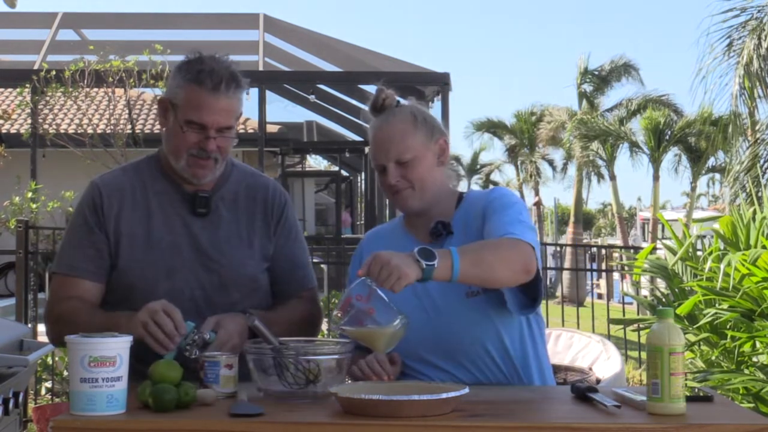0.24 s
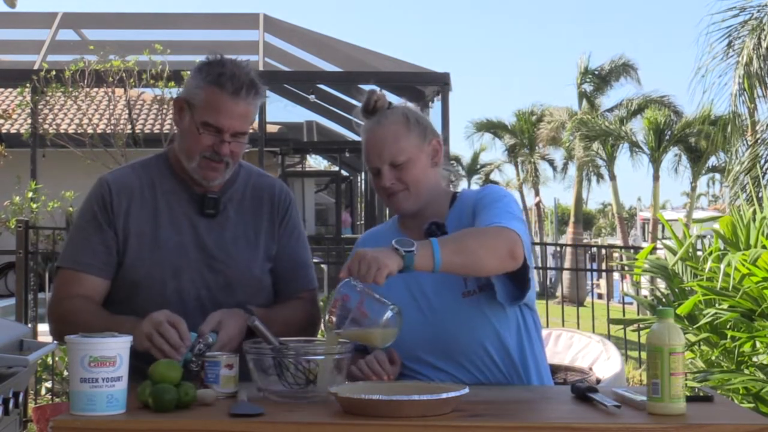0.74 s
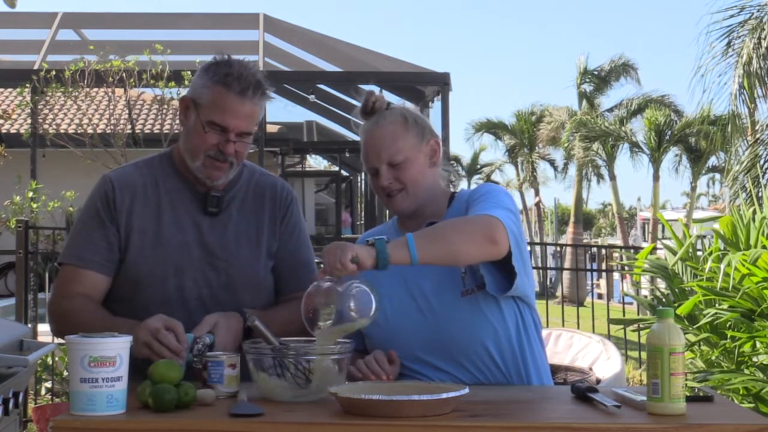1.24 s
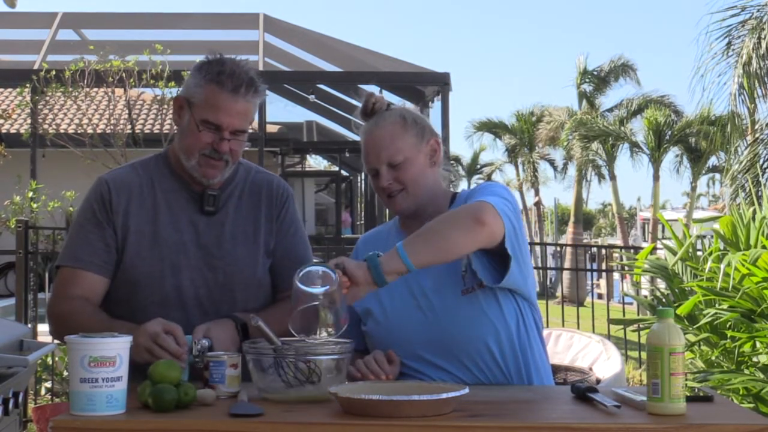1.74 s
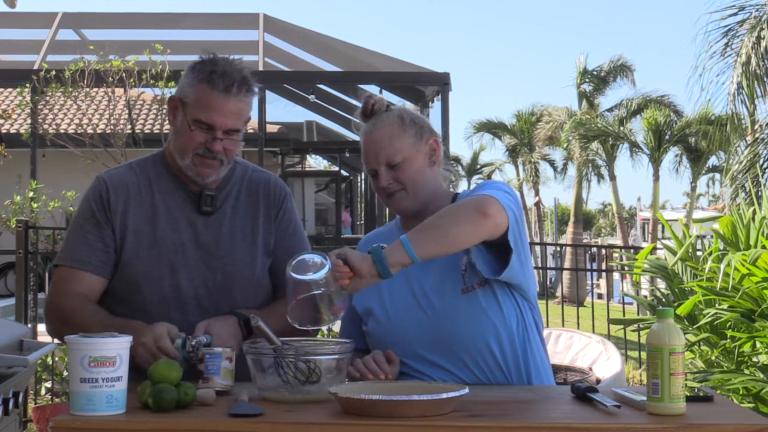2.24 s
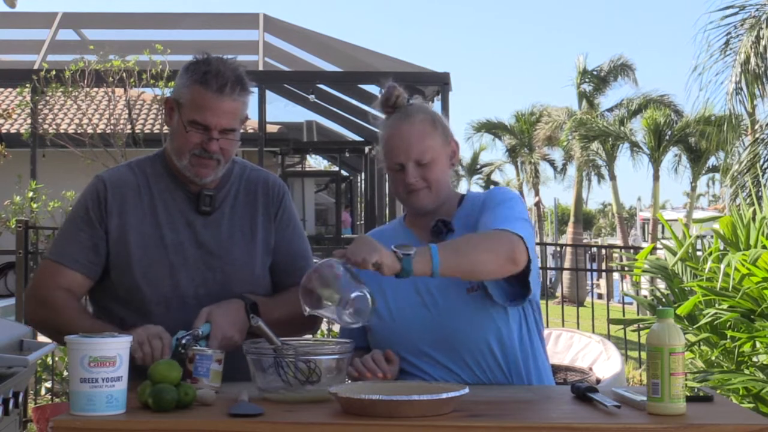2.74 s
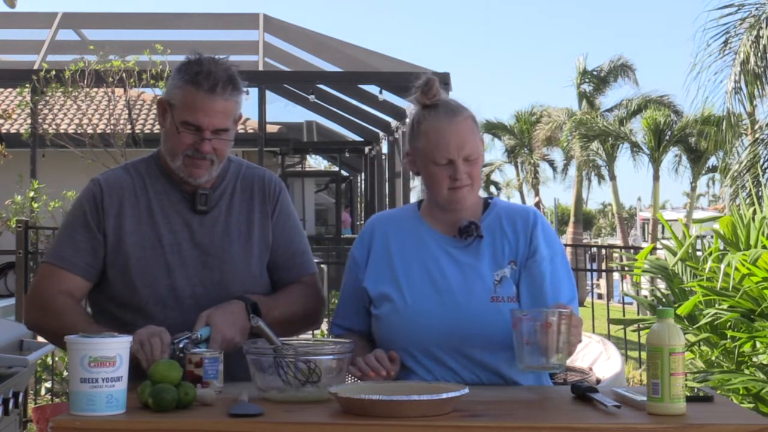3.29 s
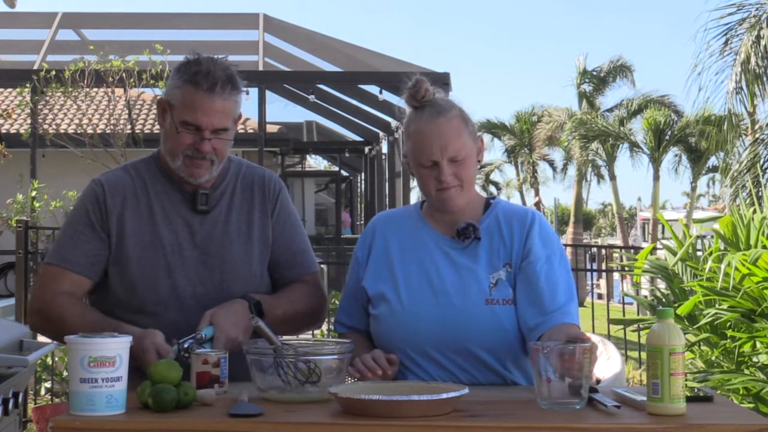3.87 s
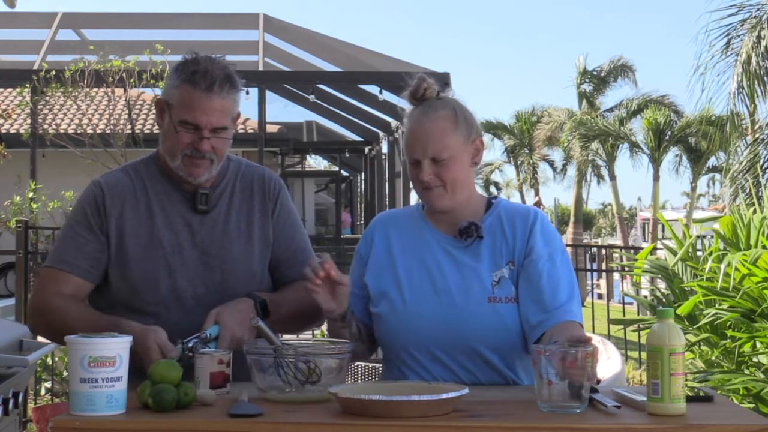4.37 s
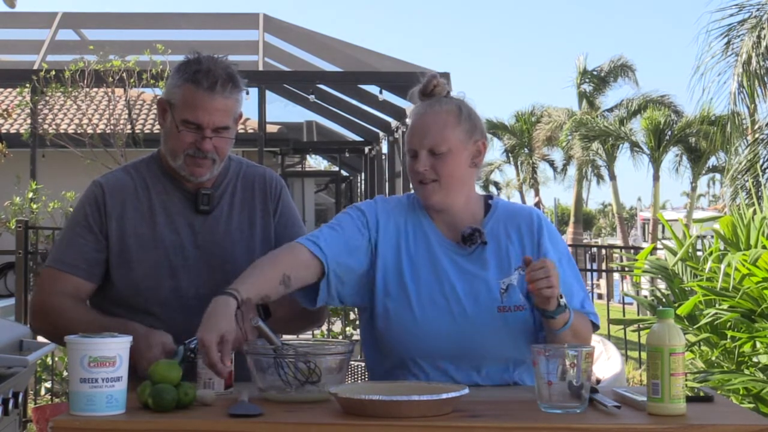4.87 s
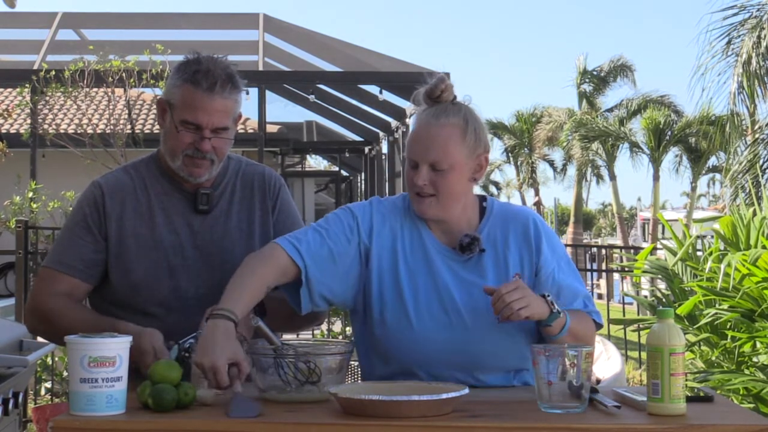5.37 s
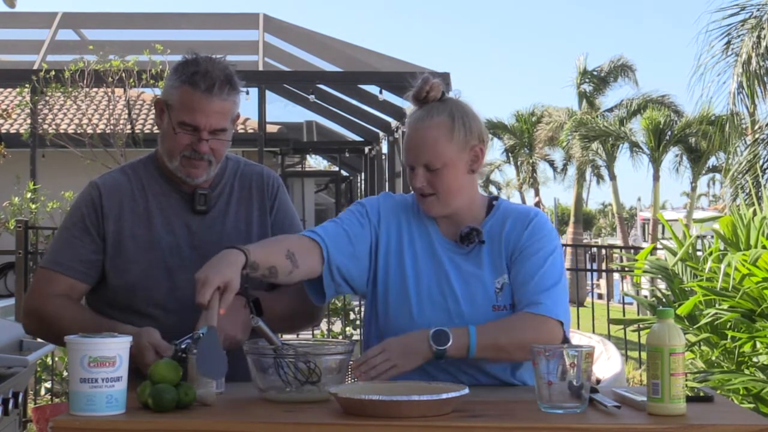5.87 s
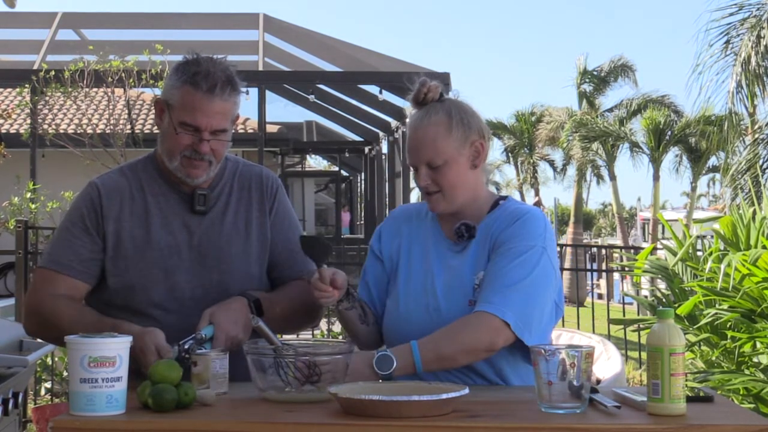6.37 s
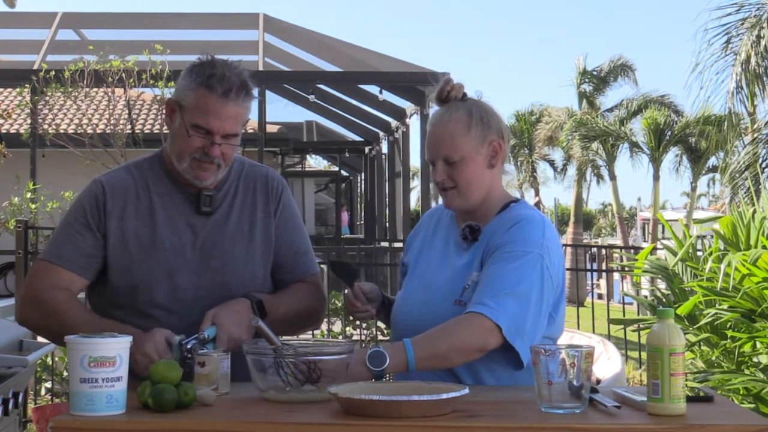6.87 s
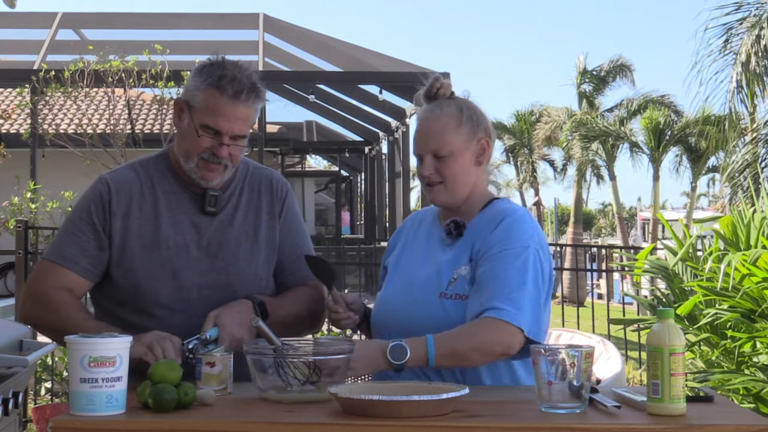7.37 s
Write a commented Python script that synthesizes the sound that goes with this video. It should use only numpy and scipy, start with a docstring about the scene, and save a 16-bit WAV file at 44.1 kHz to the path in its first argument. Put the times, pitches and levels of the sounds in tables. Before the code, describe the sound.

A brief pour of juice gurgles and splashes into a mixing bowl over faint garden hiss, with slight shirt rustle on the microphone. Then a metal can opener takes over: short, crunchy ratcheting turns about every half second, bright clicking teeth over a resonant tin rumble, some starting with a small squeak. Loose handle knocks and tiny clinks fill the gaps. Close and dry, with only weak patio reflections.

```python
"""A crank opener cuts a full can on a patio: eight turns grind through the lid while the feed wheel ticks.
Its sounds are impacts and stick-slip friction, random forces that excite the resonances of can and lid.
Juice poured into a mixing bowl is a sum of ringing air bubbles and filtered spray.
Decaying sine modes make metal clinks; shaped noise makes rustling cloth and the quiet garden.
The image is nearly mono, slightly widened by a faint, mostly high noise."""
import sys
import numpy as np
from scipy import signal
from scipy.fft import rfft, irfft
from scipy.io import wavfile
from scipy.ndimage import uniform_filter1d

SR = 44100
rng = np.random.default_rng(int(sys.argv[2]) if len(sys.argv) > 2 else 0)


def unload_audio(sound):
    """Save the sound as a 16-bit wav file, at the path given as the first command line argument."""
    columns = np.transpose(np.atleast_2d(sound))
    # keep every value between -1 and 1, then stretch to whole-number steps
    steps = np.round(np.clip(columns, -1, 1) * 32767)
    wavfile.write(sys.argv[1], SR, steps.astype(np.int16))


N = 336952
TIME = np.arange(N) / SR


def from_db(db):
    """Amplitude ratio: 20 dB is a factor of ten."""
    return 10 ** (np.asarray(db) / 20)


def rms_one(x):
    """Power normalisation: scale to rms 1."""
    return x / np.sqrt(np.mean(x ** 2) + 1e-20)


def unit_energy(x):
    """Energy normalisation: scale to a summed square of 1."""
    return x / np.sqrt(np.sum(x ** 2) + 1e-20)


def add(out, s, sound):
    """Superposition: mix a sound in from time s."""
    at = max(round(s * SR), 0)
    out[at:at + len(sound)] += sound[:N - at]


def coloured(x, points, size=2048):
    """Minimum-phase filtering: a causal response through (f/Hz, level/dB) points, by a folded cepstrum."""
    hz, db = np.transpose(points)
    grid = np.maximum(np.arange(size // 2 + 1) * SR / size, 1)
    log_gain = np.log(from_db(np.interp(np.log(grid), np.log(hz), db)))
    cepstrum = irfft(log_gain)
    cepstrum[1:size // 2] *= 2
    cepstrum[size // 2 + 1:] = 0
    response = irfft(np.exp(rfft(cepstrum)))
    return signal.fftconvolve(x, response)[:len(x)]


def dying(t, t60):
    """Exponential decay: the envelope falls 60 dB in t60."""
    return np.exp(-np.log(1000) * t / t60)


def stroke(start, end, rise_s, fall_s):
    """Exponential onset and decay: steady between two times, 60 dB lower rise_s before and fall_s after."""
    onset = dying(np.clip(start - TIME, 0, 1), rise_s)
    return onset * dying(np.clip(TIME - end, 0, 1), fall_s)


def along(curve, axis):
    """Level interpolation: gain over time from one dB column, at -200 dB before the curve begins."""
    rows = np.array(curve)
    return from_db(np.interp(TIME, rows[:, 0], rows[:, axis], left=-200))


def drift(rate):
    """Random modulation: straight lines join normal random values, rate of them a second."""
    return np.interp(TIME * rate, np.arange(4096), rng.standard_normal(4096))


def grains(per_s, spread_db):
    """Shot noise: randomly timed clicks of uneven size and sign."""
    sizes = from_db(spread_db * np.minimum(rng.exponential(1, N), 4))
    sizes = sizes * rng.choice([-1, 1], N)
    return sizes * (rng.random(N) < per_s / SR)


def resonate(x, table):
    """Parallel resonance: the direct sound plus two-pole modes whose decay follows from their width."""
    out = x.copy()
    for hz, width_hz, db in table:
        r = np.exp(-np.pi * width_hz / SR)
        feed = np.array([1, 0, -1]) * (1 - r * r) / 2
        back = [1, -2 * r * np.cos(2 * np.pi * hz / SR), r * r]
        out += from_db(db) * signal.lfilter(feed, back, x + 1e-18)
    return out


# resonances of can and opener: f/Hz, width/Hz, level over the direct sound/dB
CAN_MODES = [(291, 13.7, 3.5), (334.5, 67, 3), (454, 21, -8.5), (528, 56, -6.5), (734.7, 27, -3),
             (780, 61, -5.5), (865, 91, -8), (1150, 166, -2.5), (1273, 92, -0.5), (1467, 55, 7),
             (1590, 106, 2), (1845, 160, 3.5), (2080, 80, -30), (2190, 210, -9.5), (2790, 94, -18),
             (4900, 110, -8), (8940, 50, 2.5), (9500, 230, 7), (9800, 240, 7.5)]


def can(x):
    """Forced resonance: every contact rings the can and the opener."""
    return resonate(x, CAN_MODES)


def blow(t, chatter_db, t60, build_s=0.005):
    """Impulsive excitation: a click, then the dense, quickly dying chatter of loose metal parts."""
    chatter = rng.standard_normal(len(t)) * dying(t, t60) * (1 - dying(t, build_s))
    force = from_db(chatter_db) * unit_energy(chatter)
    force[0] += 1
    return force


# turns of the crank: start t/s, end t/s, time per tooth/s, hardest tooth level/dB, its place in the turn (0-1),
# can rumble level/dB, hiss level/dB, top treble gain/dB
TURNS = [(2.9006, 2.968, 0.017, -1, 0.7, -21, -40.5, -3.5),
         (3.8253, 3.913, 0.013, -2.5, 0.46, -19.5, -41.5, -2.5),
         (4.2884, 4.35, 0.0158, -1.5, 0.54, -17, -36.5, -4.5),
         (4.7622, 4.831, 0.013, -3.5, 0.46, -17, -37, 6.5), (5.291, 5.34, 0.021, -2, 0.5, -18, -39.5, 3),
         (5.838, 5.912, 0.0178, -2, 0.47, -18, -38, -4.5),
         (6.355, 6.432, 0.019, -1, 0.46, -19.5, -33.5, -8.5), (6.922, 7.004, 0.02, -1, 0.23, -19, -31, -13)]
# single snaps outside the even runs of teeth, one of them a loud extra tooth during a turn:
# t/s, level before single_db/dB
SINGLE_SNAPS = [(0.6449, -20.5), (0.6955, -20), (0.8594, -27.5), (3.2207, -40), (5.222, -31), (5.7388, -28),
                (6.4171, -17), (7.3073, -39)]
# colour of a tooth's contact: f/Hz, relative level/dB
TOOTH_COLOUR = [(200, 0.5), (800, 2), (3000, 19), (4200, 4.5), (5500, 6), (8400, -11.5), (12000, -1.5),
                (15000, -11.5)]


def teeth(single_db=11.5, delay_s=0.001242, ease_db=25.5, scatter_db=1.0):
    """Periodic impact: each tooth snaps into the rim, in an even run that swells and eases through a turn."""
    out, t = np.zeros(N), TIME[:SR // 10]
    snaps = [(s, db + single_db) for s, db in SINGLE_SNAPS]
    for start, end, tooth_s, db, hardest, *_ in TURNS:
        s = np.arange(start, end, tooth_s)
        away = (s - start) / (end - start) - hardest
        # ease_db would be the loss a whole turn away from the hardest tooth
        levels = db - ease_db * away ** 2 + scatter_db * rng.standard_normal(len(s))
        snaps += zip(s, levels)
    for s, db in snaps:
        force = blow(t, chatter_db=24.0, t60=0.014, build_s=0.00079)
        snap = unit_energy(can(coloured(force, TOOTH_COLOUR)))
        add(out, s + delay_s, from_db(db) * snap)
    return out


# slides on the rim while the opener is being seated: start t/s, end t/s, rise/s, fall/s,
# can rumble level/dB, hiss level/dB, top treble gain/dB
SCRAPES = [(0.586, 0.588, 0.064, 0.16, -30.5, -39.5, -8), (0.82, 0.841, 0.086, 0.12, -32, -43, -0.5),
           (1.842, 1.875, 0.035, 0.41, -33, -35.5, -14), (2.292, 2.324, 0.1, 0.12, -42, -45, 11),
           (2.335, 2.392, 0.1, 0.18, -33.5, -39, -10)]
TURN_RISE_S, TURN_FALL_S = 0.047, 0.14   # 60 dB rise and fall; grind() shortens the fall for the hiss


def slides():
    """Sliding contact: the seating scrapes, then the turns, all with the columns of a scrape."""
    turns = [(start, end, TURN_RISE_S, TURN_FALL_S, rumble_db, hiss_db, top_db)
             for start, end, *_, rumble_db, hiss_db, top_db in TURNS]
    return list(SCRAPES) + turns


def steel(x, t60=0.024):
    """High modal density: crowded high modes of thin steel parts ring on briefly, as decaying noise."""
    t = TIME[:SR // 10]
    ringing = unit_energy(rng.standard_normal(len(t)) * dying(t, t60))
    return x / 2 + 0.86 * signal.oaconvolve(x, ringing)[:N]


# colours of coarse slips and of fine tearing: f/Hz, relative level/dB
RUMBLE_COLOUR = [(40, -80.5), (120, -16), (230, -10), (300, 4.5), (450, 3.5), (630, 3.5), (850, 4),
                 (1300, -2.5), (1650, -18.5), (2800, -12.5), (4000, -20.5), (9000, -70.5)]
HISS_COLOUR = [(500, -22), (1500, 8), (3000, 9), (4000, 2.5), (5500, 4), (7300, 0), (8400, -9),
               (10000, -4.5), (12500, 1.5), (15000, -19)]
# the lid sings under the blade: f/Hz, width/Hz, level over the direct sound/dB
LID_MODES = [(726, 4.4, 5), (1494, 5.4, 11), (2964, 45, -9.5), (4730, 150, -3)]


def grind(slips_per_s=1800, tears_per_s=7000, uneven_db=3.0, hiss_fall_share=0.9):
    """Stick-slip friction: steel slides on tin; coarse slips shake the can and fine tearing hisses."""
    jerk = from_db(uneven_db * drift(220))
    slips = jerk * grains(slips_per_s, spread_db=3.0)
    rumble = resonate(can(coloured(slips, RUMBLE_COLOUR)), LID_MODES)
    rumble /= np.sqrt(uniform_filter1d(rumble ** 2, SR // 25))   # the hand keeps the force steady
    tears = jerk * grains(tears_per_s, spread_db=2.5)
    hiss = rms_one(resonate(can(coloured(tears, HISS_COLOUR)), LID_MODES))
    out = np.zeros(N)
    for start, end, rise_s, fall_s, rumble_db, hiss_db, _ in slides():
        out += from_db(rumble_db) * rumble * stroke(start, end, rise_s, fall_s)
        # the blade sits somewhere else at each stroke, so the steel rings differently
        tearing = hiss * stroke(start, end, rise_s, hiss_fall_share * fall_s)
        out += from_db(hiss_db) * steel(tearing)
    return out


def shrillness(x, edge_hz=8200):
    """Spectral balance: the top treble changes from stroke to stroke as the hands move round the can."""
    start, end, *_, top_db = np.transpose(slides())
    top = signal.sosfiltfilt(signal.butter(4, edge_hz, "high", fs=SR, output="sos"), x)
    gain = from_db(np.interp(TIME, (start + end) / 2, top_db))
    return x + (gain - 1) * top


def band(x, hz, width_hz):
    """Band-pass filtering: a resonance of the given width around hz."""
    edges = [hz - width_hz / 2, hz + width_hz / 2]
    return signal.sosfilt(signal.butter(2, edges, "band", fs=SR, output="sos"), x)


# the axle squeaks on some turns as it takes up the load: start t/s, end t/s, level/dB, f/Hz
SQUEAKS = [(2.877, 2.938, -38.5, 3110), (3.816, 3.865, -38.5, 2930), (4.747, 4.775, -42, 2900),
           (5.242, 5.267, -41.5, 2866)]


def squeaks(width_hz=70.0, rasp_db=-11.0):
    """Stick-slip resonance: uneven slips of the crank axle ring one sharp mode over a broader rasp."""
    out = np.zeros(N)
    for start, end, db, hz in SQUEAKS:
        slips = grains(2500, spread_db=0.5) + 1e-18
        tone = band(slips, hz, width_hz)
        rasp = rms_one(band(slips, hz, 10 * width_hz))
        tone /= np.sqrt(np.abs(uniform_filter1d(tone ** 2, SR // 50)) + 1e-12)   # the hand keeps the force steady
        envelope = stroke(start, end, rise_s=0.011, fall_s=0.07)
        out += from_db(db) * envelope * (tone + from_db(rasp_db) * rasp)
    return out


# the opener rocks against the can as the hand lets go and grips again:
# t/s, level before level_db/dB, bass share/dB, treble share/dB
KNOCKS = [(0.574, -13.5, -9, -40), (0.645, -18.5, -8, -14), (0.695, -17.5, -10.5, -16.5),
          (1.969, -20.5, -13, -48), (2.014, -23, -14, -43), (2.762, -1.5, -18, -11), (2.955, -1, -21, -17),
          (3, -17, -9.5, -7.5), (3.08, -4, -17.5, -17), (3.129, -13, -18, -18.5), (3.194, -27, -10, -23),
          (3.292, -4.5, -18.5, -29), (3.59, -13.5, -15, -11.5), (3.748, -19.5, -12.5, -20.5),
          (3.896, -4.5, -21, -27), (4.009, -3, -16, -25), (4.04, -0.5, -15, -22.5), (4.072, -7.5, -7, -32),
          (4.229, -14.5, -1, -11), (4.281, -3.5, -41, -9), (4.491, -4, -19.5, -29.5),
          (4.557, -22.5, -22, -29), (4.694, -10.5, -26.5, -28), (4.916, -14.5, -12, -37),
          (4.973, -19, -10.5, -50), (5.139, -25, -14, -23), (5.202, -11, -18, -29), (5.223, -12.5, -10, -1),
          (5.25, -11.5, -15.5, -23.5), (5.362, -3.5, -15, -25), (5.379, -6, -15, -18),
          (5.477, -2.5, -17, -26), (5.509, -5.5, -13, -18.5), (5.651, -13.5, -13, -36),
          (5.747, -9.5, -17.5, -20.5), (5.818, -15, -12, -28), (5.996, -14, -15, -40),
          (6.084, -6, -35, -17), (6.282, -16, -36, -22), (6.339, -4, -17, -17), (6.477, -15, -24, -27),
          (6.512, -14.5, -6, -47), (6.644, -14, -15.5, -48), (6.903, -16, -11, -9), (6.923, -6, -23, -12),
          (7.029, -3.5, -20, -15.5), (7.236, -9, -30, -28), (7.392, -17.5, -26, -33)]
# colour of a knock's contact: f/Hz, relative level/dB
KNOCK_COLOUR = [(40, -73.5), (120, -13.5), (220, -9), (300, 1.5), (500, 7), (630, 3.5), (850, 3.5),
                (1300, -6), (1650, -15.5), (2200, -15.5), (2500, -21.5), (3500, -34), (6000, -59.5),
                (12000, -76)]


def knocks(level_db=18.0, delay_s=0.0016, hard_slope=0.75, rebound_s=0.02, rebound_db=-13.5, rebound_cut_hz=740):
    """Impact hardness: hard contacts are bright, soft ones dull; each falls back once, softer and duller."""
    out, t = np.zeros(N), TIME[:SR // 5]
    usual_bass, usual_treble = np.median(KNOCKS, axis=0)[2:]
    soft = signal.butter(2, rebound_cut_hz, fs=SR, output="sos")
    for s, db, bass_db, treble_db in KNOCKS:
        force = blow(t, chatter_db=7.0, t60=0.042)
        # the bass chatters longer than the treble
        slow_chatter = unit_energy(rng.standard_normal(len(t)) * dying(t, t60=0.075))
        force += from_db(-0.5) * coloured(slow_chatter, [(1300, 3), (3200, -15)])
        hard = hard_slope * (treble_db - usual_treble)
        contact = [(380, bass_db - usual_bass), (850, 0.0029), (1900, hard), (4500, hard)]
        struck = coloured(coloured(force, KNOCK_COLOUR), contact)
        knock = from_db(db + level_db) * unit_energy(can(struck))
        add(out, s + delay_s, knock)
        fall_back = from_db(rebound_db) * signal.sosfilt(soft, knock)
        add(out, s + rebound_s * rng.uniform(0.7, 1.4), fall_back)
    return out


def bubble(hz, cycles, rise, longest_s=0.07):
    """Bubble resonance: the pitch rises as a bubble nears the surface; thick juice damps the big ones."""
    t60 = min(cycles / hz, longest_s)
    t = TIME[:int(t60 * SR) + 2]
    return np.sin(2 * np.pi * hz * t * (1 + rise * t / t60)) * dying(t, t60)


# the stream of juice, before the mix in juice(): t/s, bubble level/dB, spray level/dB
POUR = [(0.88, -57.5, -56.5), (0.99, -54, -56), (1.006, -53, -45), (1.106, -45, -53.5), (1.12, -51.5, -37),
        (1.13, -42.5, -42.5), (1.308, -58, -54), (1.386, -38, -42), (1.595, -36.5, -37)]
POUR_STOP_S, POUR_FALL_S = 1.625, 0.16   # the cup runs empty and the stream dies by 60 dB


def stream(axis):
    """Source strength: gain of the juice over time, for its bubbles (column 1) or its spray (column 2)."""
    return along(POUR, axis) * dying(np.clip(TIME - POUR_STOP_S, 0, 1), POUR_FALL_S)


def fizz(low_hz, high_hz, cycles, count):
    """Bubble statistics: many small bubbles, more while the stream is strong, evened to about rms 1."""
    out = np.zeros(N)
    born = np.cumsum(stream(axis=1) ** 0.8)
    for when, pitch, size, depth in rng.random((count, 4)):
        hz = low_hz * (high_hz / low_hz) ** pitch
        s = np.searchsorted(born, when * born[-1]) / SR
        add(out, s, from_db(-20 * size) * bubble(hz, cycles, rise=0.08 * depth))
    return out / np.sqrt(np.abs(uniform_filter1d(out ** 2, SR // 20)) + 1e-6)


# the loudest single drops: t/s, level before drop_db or splash_db/dB, starting bubble f/Hz
DROPS = [(0.9558, -34.5, 2240), (1.0181, -25.5, 6030), (1.0445, -31, 5140), (1.0874, -29, 1200),
         (1.1222, -27, 6130), (1.1414, -27, 5770), (1.2131, -26.5, 5650), (1.2605, -34, 5160),
         (1.4386, -24, 4800), (1.5214, -19.5, 1630), (1.5446, -19, 5500), (1.615, -15.5, 1714),
         (1.6429, -13, 5460), (1.7384, -19, 1130)]
# colour of spray and splashes: f/Hz, relative level/dB
SPRAY_COLOUR = [(200, -20), (700, -61), (1500, 11), (3300, -9), (5500, 2), (9000, -18), (15000, -12)]


def juice(bubble_db=-3.5, fine_db=-3.0, spray_db=-10.5, drop_db=-2.5, splash_db=-9.5):
    """Entrained air: a thin stream lands in the bowl as ringing bubbles, noisy spray and single drops."""
    out = from_db(bubble_db) * stream(axis=1) * fizz(1363, 3270, cycles=100, count=700)
    spray = from_db(spray_db) * rms_one(coloured(grains(3600, spread_db=6), SPRAY_COLOUR))
    fine = fizz(3810, 7050, cycles=76, count=380)
    fine += from_db(-5.5) * fizz(7420, 14400, cycles=150, count=420)
    out += stream(axis=2) * (spray + from_db(fine_db) * fine)
    t = TIME[:SR // 20]
    for (s, db, hz), depth in zip(DROPS, rng.random(len(DROPS))):
        drop = bubble(hz, cycles=92, rise=0.065 + 0.1 * depth)
        add(out, s + 0.00101, from_db(db + drop_db) * drop)
        splash = coloured(rng.standard_normal(len(t)) * dying(t, t60=0.052), SPRAY_COLOUR)
        add(out, s, from_db(db + splash_db) * splash)
    return signal.sosfilt(signal.butter(2, 450, "high", fs=SR, output="sos"), out)


def gulp(start_s=1.38, end_s=1.62, level_db=-42, start_hz=1490, climb_hz_per_s=2680, count=60, pitch_scatter=0.144):
    """Bubble size and pitch: the plunging main stream drags down larger bubbles that shrink and so climb."""
    out = np.zeros(N)
    for when, pitch, size in rng.random((count, 3)):
        age = when * (end_s - start_s)
        hz = (start_hz + climb_hz_per_s * age) * (1 + pitch_scatter * (2 * pitch - 1))
        # each bubble lies 0 to 10 dB above level_db
        add(out, start_s + age, from_db(level_db + 10 * size) * bubble(hz, cycles=90, rise=0.08))
    return out


# light metal clinks: t/s, level before clink_db/dB
CLINKS = [(5.1025, -28.5), (5.1523, -33.5), (5.444, -37)]
# modes of the metal pieces: f/Hz, mean relative level/dB, t60 before ring_stretch/s
CLINK_MODES = [(6940, -8, 0.035), (7920, -8.5, 0.032), (8796, -9, 0.063), (9860, -6, 0.069),
               (10500, -16, 0.12), (10860, -0.5, 0.061), (12100, -15, 0.067), (13000, -6, 0.027)]
# thin high pips: t/s, level before pip_db/dB, f/Hz
PIPS = [(2.617, -33, 13200), (4.6505, -38.5, 11500), (4.785, -15.5, 9550)]


def clinks(clink_db=-9.0, pip_db=-5.0, ring_stretch=1.8, shimmer_db=-8.0):
    """Modal synthesis: touching metal rings in sines and a shimmer of crowded weaker modes; pips are noise."""
    out, t = np.zeros(N), TIME[:SR // 3]
    shimmer_colour = [(2500, -8), (6000, -16), (8000, -1), (13000, -6), (15000, -20)]
    for s, db in CLINKS:
        modes = np.zeros(len(t))
        for hz, mode_db, t60 in CLINK_MODES:
            gain = from_db(mode_db + rng.normal(0, 2.0))
            modes += gain * np.sin(2 * np.pi * hz * t) * dying(t, ring_stretch * t60)
        shimmer = rms_one(coloured(rng.standard_normal(len(t)), shimmer_colour)) * dying(t, t60=0.1)
        soft_touch = 1 - dying(t, t60=0.0032)
        add(out, s, from_db(db + clink_db) * (modes + from_db(shimmer_db) * shimmer) * soft_touch)
    for s, db, hz in PIPS:
        pip_colour = [(hz * 0.67, -35), (hz, 0), (hz * 1.42, -25)]
        pip = rms_one(coloured(rng.standard_normal(len(t)), pip_colour))
        add(out, s, from_db(db + pip_db) * pip * dying(t, t60=0.023))
    return out


# cloth brushing the microphone: start t/s, end t/s, level/dB
CLOTH = [(0.02, 0.014, -35.5), (0.07, 0.168, -46), (0.35, 0.386, -51.5), (1.917, 2.02, -50),
         (2.08, 2.154, -36.5), (2.206, 2.235, -33)]
# colour of the rubbing: f/Hz, relative level/dB
CLOTH_COLOUR = [(30, -10), (70, -2.5), (140, 5.5), (300, -3.5), (800, -9.5), (1600, -32.5), (5000, -32),
                (12000, -44.5)]


def cloth(rise_s=0.16, fall_s=0.19, lumpy_db=3.0, pressing_db=0.5):
    """Friction noise: a shirt rubs on the microphone in dull lumps, pressing harder and softer as it goes."""
    pressure = sum(from_db(db) * stroke(start, end, rise_s, fall_s) for start, end, db in CLOTH)
    lumps = from_db(lumpy_db * drift(90) + pressing_db * drift(30.42))
    return pressure * rms_one(coloured(rng.standard_normal(N) * lumps, CLOTH_COLOUR))


# colour of the reflections: f/Hz, relative level/dB
PATIO_COLOUR = [(100, -11.5), (400, -10.5), (1000, -13.5), (2000, -9.5), (4000, -15), (12000, -14)]


def patio(x, t60=0.36, build_s=0.0066):
    """Diffuse reflection: faint scattered echoes from table, wall and roof, as decaying noise."""
    t = TIME[:SR // 2]
    echoes = unit_energy(rng.standard_normal(len(t)) * dying(t, t60) * (1 - np.exp(-t / build_s)))
    return signal.fftconvolve(x, coloured(echoes, PATIO_COLOUR))[:N]


# garden air, before the gains in scene(): t/s, low murmur level/dB, high hiss level/dB
AIR = [(0.0, -56, -57), (0.64, -48, -59), (1.38, -51, -68.5), (2.3, -58, -74.5), (2.47, -56, -68.5),
       (5.49, -56.5, -66.5), (7.64, -58.5, -70.5)]
# colours of the murmur and of the hiss: f/Hz, relative level/dB
AIR_LOW = [(30, -31), (100, -11.5), (142, 1.5), (185, -10), (260, -3), (650, -1), (900, -7), (1400, -13),
           (2400, -18), (3500, -19.5), (7000, -47)]
AIR_HIGH = [(900, -10), (2000, 3.5), (3000, -10.5), (4200, 1.5), (5600, -3.5), (8000, -8), (12000, -12.5),
            (15500, -15)]


def garden(low_db=0.0, high_db=0.0):
    """Ambient noise: a distant outdoor rumble and a smooth hiss, each filtered from white noise."""
    low = along(AIR, axis=1) * rms_one(coloured(rng.standard_normal(N), AIR_LOW))
    high = along(AIR, axis=2) * rms_one(coloured(rng.standard_normal(N), AIR_HIGH))
    return from_db(low_db) * low + from_db(high_db) * high


def scene():
    """Mid-side stereo: sources sit in the middle; a faint, mostly high noise widens the image."""
    opener = knocks() + shrillness(teeth() + grind()) + squeaks()
    direct = opener + juice() + gulp() + clinks()
    mid = direct + from_db(-10.5) * patio(direct) + cloth() + garden()
    # the widening noise: a short treble smear that follows the sources, over a steadier floor
    smear_colour = [(600, -70), (2000, -56.5), (5000, -47.0), (12000, -20.5)]
    smear = coloured(patio(direct, t60=0.06, build_s=0.002), smear_colour)
    floor = from_db(-16) * garden(low_db=0.5, high_db=9.0)
    side = smear + floor
    return np.array([mid + side, mid - side])


def record(dry, low_cut_hz=62, high_cut_hz=15100, full_scale=0.95):
    """Saturation and band limiting: peaks are rounded, the deep bass is thinned and the top is cut."""
    rounded = full_scale * np.tanh(dry / full_scale)
    thinned = signal.sosfilt(signal.butter(2, low_cut_hz, "high", fs=SR, output="sos"), rounded)
    return signal.sosfiltfilt(signal.butter(16, high_cut_hz, fs=SR, output="sos"), thinned)


dry = scene()
out = record(dry)
unload_audio(out)
```